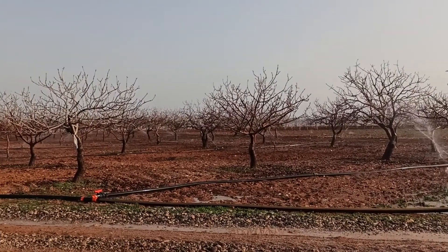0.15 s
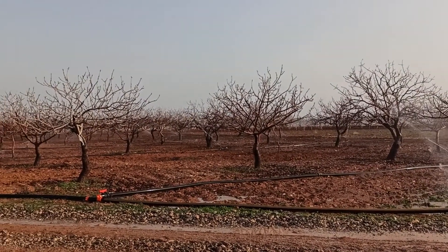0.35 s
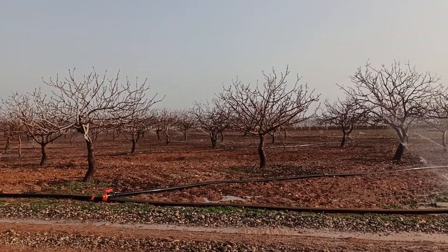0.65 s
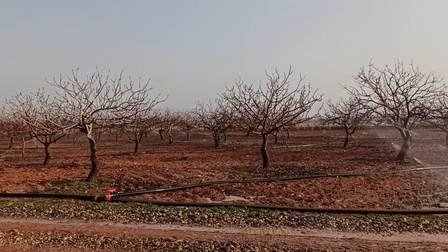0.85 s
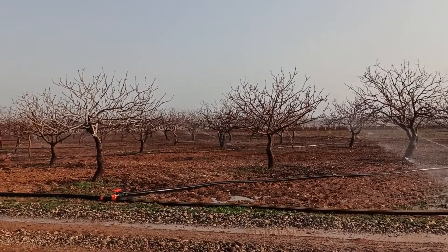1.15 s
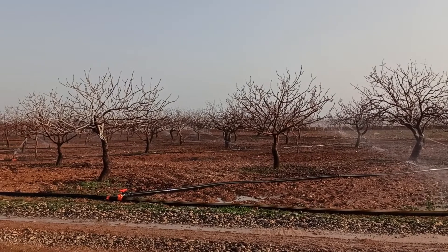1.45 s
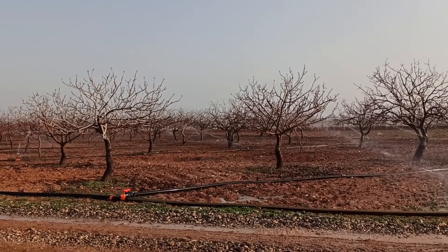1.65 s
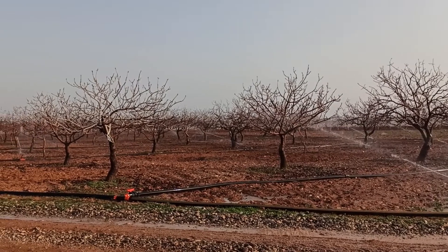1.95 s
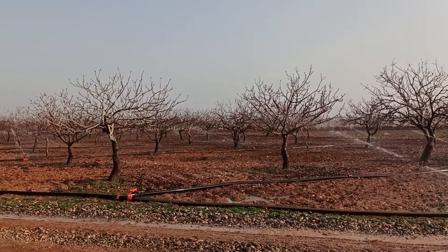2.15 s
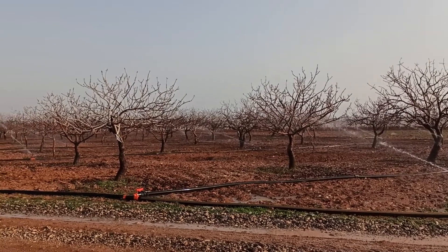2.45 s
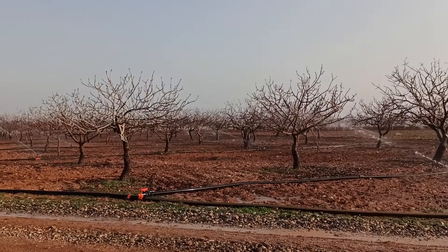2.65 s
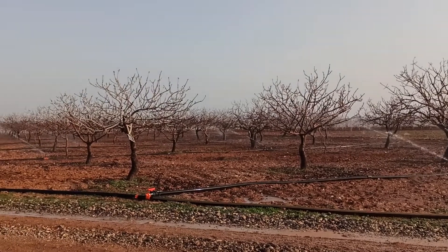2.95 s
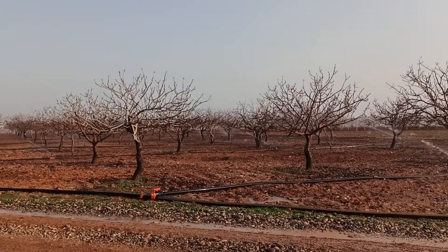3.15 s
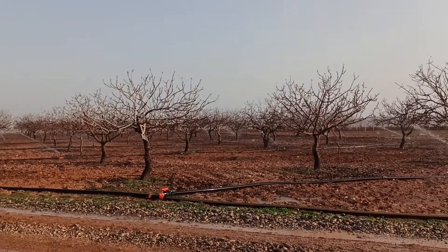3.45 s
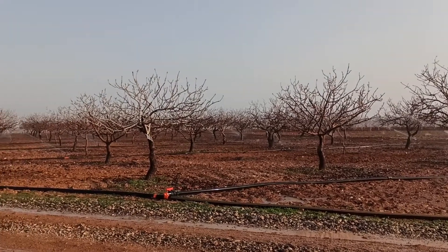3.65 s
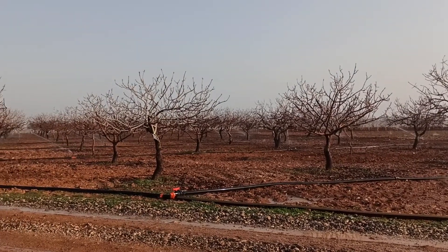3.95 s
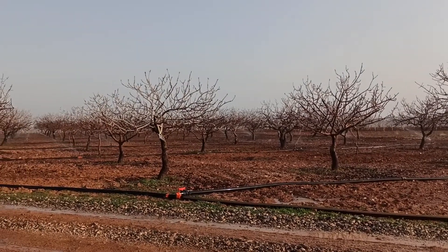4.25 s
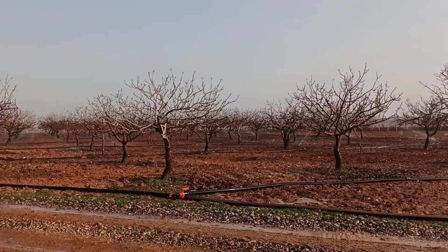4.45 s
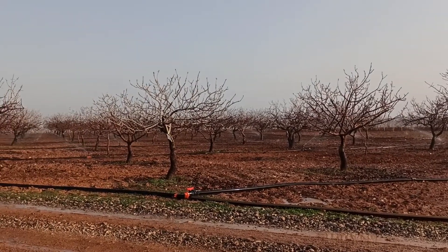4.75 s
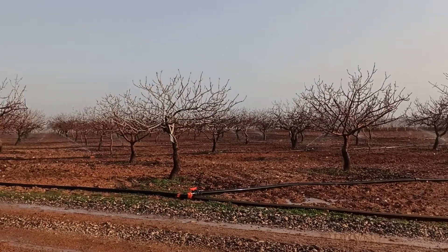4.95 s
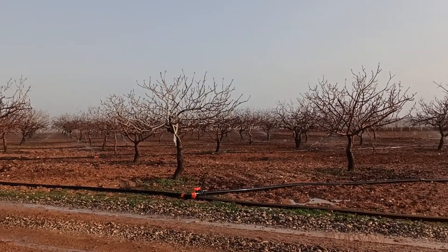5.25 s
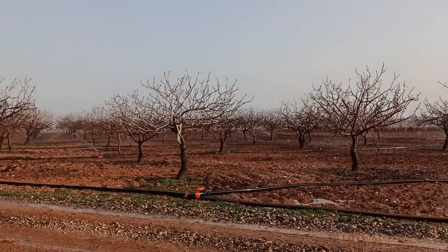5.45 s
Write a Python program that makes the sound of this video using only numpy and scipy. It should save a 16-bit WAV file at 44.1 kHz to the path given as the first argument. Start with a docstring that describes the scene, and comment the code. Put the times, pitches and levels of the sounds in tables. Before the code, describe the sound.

An impact sprinkler ticks and spits hissing water, switching between a quick rattle and slower even steps, with light wind rumbling on the microphone.

```python
"""An open orchard, with the microphone near an impact sprinkler. Its arm chops the jet: a quick rattle as
the head swings back, slow even steps as it sweeps forward, then the rattle again. Every chop is a slap,
a crack and a spit of spray. The jets hiss, drops land nearby, and two more sprinklers tick farther off.
Light wind buffets the microphone over the distant air, and there are two dry knocks right beside it."""
import sys
import numpy as np
from scipy import signal
from scipy.fft import rfft, irfft, next_fast_len
from scipy.io import wavfile
from scipy.ndimage import uniform_filter1d

SR = 44100
rng = np.random.default_rng(int(sys.argv[2]) if len(sys.argv) > 2 else 0)


def digitize_waveform(pressure):
    """Quantize a signal to 16-bit integers and store it at the path in sys.argv[1].

    Rows of a 2-D input are taken as channels; values are limited to [-1, 1].
    """
    field = np.atleast_2d(pressure).T
    bounded = np.clip(field, -1, 1)
    quanta = np.round(bounded * 32767).astype(np.int16)
    wavfile.write(sys.argv[1], SR, quanta)


N = 246508
TIME = np.arange(N) / SR

# near sprinkler, runs of chops forward and back: (start [s], end [s], first gap [s], settled gap [s])
SWEEP_RUNS = [(0.0801, 0.15, 0.1163, 0.1174), (1.8373, 4.8, 0.1163, 0.1174)]
RETURN_RUNS = [(0.2045, 1.75, 0.037, 0.04485), (4.8767, 5.59, 0.0367, 0.04855)]
# a chop as the head turns: (time [s], slap [dB], crack [dB], coarse spray [dB], fine spray [dB])
SWEEP_LEVELS = [(0.08, -44, -44, -41.5, -40), (1.84, -46, -35, -41.5, -50.5),
                (2.19, -45.5, -31.5, -45, -41.5), (2.42, -33.5, -29.5, -44.5, -44),
                (2.95, -46.5, -31, -39.5, -45), (3.6, -36.5, -28, -37.5, -41.5),
                (4.08, -34.5, -24.5, -41, -38), (4.76, -38, -29, -41, -40.5)]
RETURN_LEVELS = [(0.2, -39, -41, -48.5, -45.5), (0.45, -42.5, -49, -45, -49),
                 (0.85, -46, -52, -46.5, -55.5), (1.02, -38.5, -58, -45.5, -51),
                 (1.1, -32, -52, -41.5, -43), (1.25, -29, -54, -45, -42.5), (1.32, -42, -55, -50.5, -50),
                 (1.47, -32.5, -52, -43, -40), (1.65, -30, -36, -48.5, -45), (1.73, -40, -38, -50, -49),
                 (4.88, -42.5, -28.5, -42.5, -42), (5.07, -42.5, -35, -45, -39.5),
                 (5.3, -32.5, -29, -40.5, -37), (5.57, -28, -56, -46.5, -38)]
# chops where the arm lands squarely: (time [s], extra slap [dB], extra crack [dB])
HARD_BLOWS = [(0.43, 11, 9), (0.51, 11, 10), (0.59, 15.5, 6), (0.67, 15.5, 11), (1.17, 3, 0),
              (1.214, 1.5, 0), (1.6, 1, -2), (2.3, 6, -0.5), (2.65, 5, 1), (2.77, 9.5, 0.5),
              (3.235, 11.5, 3.5), (3.585, 6.5, 3), (3.82, 5.5, 1), (4.52, 4, 4), (4.877, 10, 7),
              (4.914, 8, 5.5), (4.99, 10.5, 6), (5.145, 9.5, 3), (5.394, 2.5, 0)]
# the arm's metal ring: (frequency [Hz], time to fall 60 dB [s], level against the crack [dB])
ARM_RING = (7425, 0.021, -2)
# reflection off the soil: (strength [ratio], shortest delay [s], longest delay [s])
GROUND_BOUNCE = (0.67, .0008, .003)
# far sprinklers, one row each: (time it faces the microphone [s], gap between ticks [s])
FAR_BEATS = [(2.492, 0.115), (3.317, 0.1329)]
# the same two: (level when facing [dB], rise before [dB/s], fade after [dB/s])
FAR_LEVELS = [(-45.5, 7, 7.5), (-44.5, 12, 4.5)]
# stray spits between the beats: (time [s], level [dB])
STRAY_SPITS = [(2.111, -48.5), (3.399, -41), (3.44, -47.5), (4.201, -47), (4.473, -48.5)]
# water landing nearby: (time [s], level [dB], pitch [Hz])
SPLATS = [(4.583, -58, 1770), (4.655, -59, 814), (4.693, -54, 1790), (4.80, -58, 2060), (4.849, -58, 1894),
          (4.87, -55, 778)]
# eddies that thump the microphone: (time [s], peak [dB], pitch [Hz])
BUFFETS = [(1.349, -34, 150), (1.373, -27, 135), (1.439, -28, 124), (1.529, -30.5, 158), (1.614, -32, 126),
           (1.773, -27, 181), (1.861, -27.5, 153), (1.868, -20, 236), (2.09, -32.5, 123), (2.185, -31, 192),
           (2.436, -27.5, 153), (2.558, -35, 157), (2.726, -29, 123), (2.955, -32, 131), (3.09, -38, 149),
           (4.068, -35, 118), (4.347, -40.5, 117), (5.019, -36.5, 170), (5.199, -38, 135),
           (5.48, -29.5, 129), (5.502, -31, 135)]
# knocks on the camera body: (time [s], peak [dB], lower edge [Hz], upper edge [Hz])
KNOCKS = [(2.9128, -16.5, 150, 1230), (5.456, -35.5, 350, 1020)]
# bands the microphone dulls: (from [Hz], to [Hz], gain [dB])
MIC_DIPS = [(4786, 6123, -10.5), (8526, 11585, -14.5)]

# how the layers swell and fade: (time [s], level [dB])
MIST_LEVEL = [(0, -55), (0.7, -54), (1.1, -52.5), (1.6, -51.5), (1.9, -51.5), (3.0, -49.5), (3.8, -54),
              (4.6, -84), (5.0, -60), (5.59, -55)]  # torn off the jet at each chop
JET_LEVEL = [(0.0, -50), (0.19, -51.5), (0.45, -48.5), (1.65, -48.5), (1.91, -50.5), (3.11, -51),
             (3.35, -47.5), (3.9, -50), (5.1, -50), (5.5, -47)]
PATTER_LEVEL = [(0, -88), (4.4, -71.5), (4.8, -67), (5.3, -65), (5.59, -72)]
WIND_LEVEL = [(0.0, -58.5), (0.75, -62.5), (1.2, -59), (1.36, -46.5), (1.7, -50), (1.87, -37.5), (2.0, -48),
              (2.12, -42), (2.28, -49.5), (2.45, -42), (2.72, -61.5), (2.98, -49.5), (3.6, -56.5),
              (4.45, -59), (4.62, -55), (5.05, -50), (5.4, -50.5), (5.52, -48)]  # one long gust and a weaker one

# spectra: (frequency [Hz], relative level [dB])
SLAP_COLOUR = [(1500, -80), (2600, -24), (3200, -11.5), (3700, 2), (4200, 3.5), (4700, -9.5), (5400, -25),
               (8000, -52)]
COARSE_COLOUR = [(1200, -57), (2400, -25), (2900, -16.5), (3300, -6.5), (3700, -3), (4250, 0.5), (4700, -1),
                 (5200, -5.5), (6500, -48.5), (9000, -61.5)]  # coarse spray
FINE_COLOUR = [(4000, -34.5), (5700, -11.5), (6200, -8), (6900, -1.5), (7550, 3), (7900, -9.5), (8400, -24),
               (9300, -31.5), (10500, -25), (11700, -22), (12500, -31), (14400, -26), (15700, -30)]  # fine spray and the crack
MIST_COLOUR = [(6000, -13), (7000, -6), (7700, 7), (8400, -0.5), (9500, -8), (11800, -2), (12700, -11),
               (14400, -2.5), (15700, -13)]
JET_COLOUR = [(1000, -18.5), (2000, -21), (2700, -15), (3400, -4.5), (4600, 0), (6300, -2), (7500, -4.5),
              (7850, -11), (8500, -15), (10000, -20.5), (11700, -15.5), (12600, -19.5), (15700, -23)]
WIND_COLOUR = [(20, -32), (38, -38), (60, -3.5), (85, 3.5), (145, -1), (230, -9.5), (340, -15.5),
               (600, -34), (1500, -53)]
AIR_COLOUR = [(40, -11.5), (90, 0.5), (200, -7.5), (350, -9), (650, -7), (1100, -17.5), (1700, -20),
              (2600, -22), (5000, -55)]

SETTLE_CHOPS = 20  # how gradually the arm eases into its settled gap
BLOW_SCATTER_DB = 1.5  # no two blows are quite alike
RETURN_MIST_DB = 2.0  # quick chops tear off more mist
FAR_FINE_DB = 3  # fine spray over coarse in a far tick
BUFFET_CYCLES, BUFFET_SHAPE = 0.57, 1.11  # how fast an eddy's rebounds die, how pointed its swing is
AIR_DB = -59.5
LOW_CUT_HZ, HIGH_CUT_HZ = 41.5, 15850


def forward_steps():
    """Close by, the arm swings hard into the jet: a blow, and spray that starts at once and dies away."""
    out = np.zeros(N)
    for s, slap_db, crack_db, coarse_db, fine_db in chops(SWEEP_RUNS, SWEEP_LEVELS):
        add(out, s, arm_blow(slap_db, crack_db, rise=0.0017))
        coarse = burst(COARSE_COLOUR, rise=0.002, fall=0.014, shape=2.0, clump_db=1.5)
        fine = burst(FINE_COLOUR, rise=0.0022, fall=0.016, shape=3.0, clump_db=3)
        mist = burst(MIST_COLOUR, rise=0.0029, fall=0.018, shape=2.3, clump_db=2)
        add(out, s + 0.0015, gain_of(coarse_db) * coarse)
        add(out, s + 0.002, gain_of(fine_db) * fine)
        add(out, s + 0.002, level(MIST_LEVEL, s) * mist)
    return out


def return_rattle():
    """Short swings keep the arm in the jet for longer: rounder spits, whose fine spray trails the blow."""
    out = np.zeros(N)
    for s, slap_db, crack_db, coarse_db, fine_db in chops(RETURN_RUNS, RETURN_LEVELS):
        add(out, s, arm_blow(slap_db, crack_db, rise=0.0023))
        coarse = burst(COARSE_COLOUR, rise=0.01, fall=0.016, shape=2.7, clump_db=2)
        fine = burst(FINE_COLOUR, rise=0.011, fall=0.0093, shape=1.68, clump_db=3)
        mist = burst(MIST_COLOUR, rise=0.0093, fall=0.013, shape=2.2, clump_db=7)
        add(out, s + 0.004, gain_of(coarse_db) * coarse)
        add(out, s + 0.007, gain_of(fine_db) * fine)
        add(out, s + 0.008, gain_of(RETURN_MIST_DB) * level(MIST_LEVEL, s) * mist)
    return out


def arm_blow(slap_db, crack_db, rise, size=4096):
    """The arm meets the jet: a slap swelling over rise seconds, then a higher crack and a metal ring."""
    slap = gain_of(slap_db) * burst(SLAP_COLOUR, rise=rise, fall=0.0022, shape=1.0, clump_db=8)
    crack = gain_of(crack_db) * burst(FINE_COLOUR, rise=0.00085, fall=0.0016, shape=0.6, clump_db=1.5)
    hz, t60, ring_db = ARM_RING
    t = (np.arange(size) - size // 2) / SR
    attack = np.clip(t / 0.001, 0, 1)
    decay = gain_of(crack_db + ring_db - 60 * np.maximum(t, 0) / t60)
    ring = attack * decay * np.sin(2 * np.pi * hz * rng.uniform(0.99, 1.01) * t)
    return slap + np.roll(crack + ring, round(0.0004 * SR))


def chop_times(runs):
    """The moments at which the arm meets the jet; the gaps lengthen as its swing settles."""
    times = []
    for start, end, first_gap, settled_gap in runs:
        count = np.arange(int((end - start) / first_gap) + 1)
        lead = (settled_gap - first_gap) * SETTLE_CHOPS * (1 - np.exp(-count / SETTLE_CHOPS))
        s = start + settled_gap * count - lead
        times.extend(s[s < end])
    return np.array(times)


def chops(runs, levels):
    """Each chop's time and levels, set by the head's aim, how squarely the arm lands, and chance."""
    s = chop_times(runs)
    when, *columns = np.transpose(levels)
    slap, crack, coarse, fine = [np.interp(s, when, column) for column in columns]
    for at, slap_db, crack_db in HARD_BLOWS:
        hit = abs(s - at) < 0.015
        slap[hit] += slap_db
        crack[hit] += crack_db
    scatter = rng.standard_normal((len(s), 4)) * [BLOW_SCATTER_DB, BLOW_SCATTER_DB, 0, 0]
    return np.column_stack([s, np.transpose([slap, crack, coarse, fine]) + scatter])


def burst(colour, rise, fall, shape, clump_db, size=4096):
    """A spit of water that swells and dies over rise and fall seconds; shape 1 is pointed, 2 is round."""
    t = (np.arange(size) - size // 2) / SR
    swell = np.exp(-abs(t / np.where(t < 0, rise, fall)) ** shape)
    spit = swell * clumped_noise(size, clump_db, per_s=899.6)
    # each spit breaks up at another height, so its bounce off the soil combs it differently
    strength, shortest, longest = GROUND_BOUNCE
    delay = rng.uniform(shortest, longest)
    spit = spit + strength * np.roll(spit, round(delay * SR))
    return tint(spit, colour) * np.sqrt(np.mean(swell ** 2))


def falling_water():
    """The jets hiss on between the chops, and their drops patter and splat on the soil nearby."""
    jets = level(JET_LEVEL) * tint(clumped_noise(N, clump_db=3, per_s=450), JET_COLOUR)
    landing = level(PATTER_LEVEL) * tint(clumped_noise(N, clump_db=2.5, per_s=150), hump(1970))
    for s, db, hz in SPLATS:
        add(landing, s, gain_of(db) * burst(hump(hz), rise=0.0063, fall=0.014, shape=1.5, clump_db=4))
    return jets + landing


def far_sprinklers():
    """Two far heads tick at their own pace, swelling and fading as they turn; stray spits fall between."""
    out = np.zeros(N)
    for (facing, gap), (db, rise, fade) in zip(FAR_BEATS, FAR_LEVELS):
        for s in np.arange(facing % gap, N / SR, gap):
            turned_away_db = max(rise * (facing - s), fade * (s - facing))
            add(out, s, far_tick(db - turned_away_db))
    for s, db in STRAY_SPITS:
        add(out, s, far_tick(db))
    return out


def far_tick(db):
    """Distance leaves only a faint, short tick of a chop."""
    coarse = burst(COARSE_COLOUR, rise=0.0038, fall=0.0079, shape=1.8, clump_db=11)
    fine = burst(FINE_COLOUR, rise=0.0018, fall=0.0039, shape=1.0, clump_db=19)
    return gain_of(db) * (coarse + gain_of(FAR_FINE_DB) * np.roll(fine, round(0.0011 * SR)))


def wind():
    """Lumpy rumble on the microphone; each strong eddy is one swing of pressure with its rebounds."""
    out = level(WIND_LEVEL) * tint(clumped_noise(N, clump_db=3, per_s=42), WIND_COLOUR)
    t = np.arange(-2048, 2049) / SR
    for s, db, hz in BUFFETS:
        swell = np.exp(-abs(t * hz / BUFFET_CYCLES) ** BUFFET_SHAPE)
        add(out, s, gain_of(db) * swell * np.cos(2 * np.pi * hz * t))
    return out


def knocks():
    """Right at the microphone: each knock is a single push on the camera body, too damped to ring."""
    out = np.zeros(N)
    for s, db, low_hz, high_hz in KNOCKS:
        body = signal.butter(2, [low_hz, high_hz], "bandpass", fs=SR, output="sos")
        push = signal.sosfilt(body, signal.unit_impulse(2048, "mid"))
        add(out, s, -gain_of(db) * push / abs(push).max())
    return out


def distant_air():
    """The low, steady wash of outdoor air, far behind everything."""
    return gain_of(AIR_DB) * tint(rng.standard_normal(N), AIR_COLOUR)


def clumped_noise(size, clump_db, per_s):
    """Noise in clumps, like water or wind: its level wanders through per_s random values a second."""
    knots = rng.standard_normal((2, size))
    wander = np.interp(np.arange(size) * per_s / SR, np.arange(size), knots[1])
    return knots[0] * gain_of(clump_db * wander)


def gain_of(db):
    """Decibels to amplitude."""
    return 10 ** (np.asarray(db) / 20)


def level(curve, s=TIME):
    """The gain of a (time [s], level [dB]) curve at time s, by default at every sample."""
    return gain_of(np.interp(s, *np.transpose(curve)))


def tint(x, colour):
    """Filters x by a (frequency [Hz], level [dB]) spectrum; the result has rms 1."""
    hz, db = np.transpose(colour)
    size = next_fast_len(len(x))
    bins = np.fft.rfftfreq(size, 1 / SR)
    response = gain_of(np.interp(np.log(bins + 1), np.log(hz), db))
    tinted = irfft(rfft(x, size) * response, size)[:len(x)]
    return tinted / np.sqrt(np.mean(tinted ** 2) + 1e-20)


def hump(hz):
    """A broad resonance as a spectrum."""
    return [(hz / 2, -35), (hz * 0.82, -6), (hz, 0), (hz * 1.19, -6), (hz * 2, -40)]


def add(mix, s, sound):
    """Mixes a sound in, with its middle at time s."""
    start = round(s * SR) - len(sound) // 2
    part = mix[max(start, 0):max(start + len(sound), 0)]
    part += sound[max(-start, 0):][:len(part)]


def scene():
    """The orchard in mono, from beside the near sprinkler."""
    sprinklers = forward_steps() + return_rattle() + far_sprinklers()
    return (sprinklers + falling_water() + wind() + knocks() + distant_air())[None]


def record(dry):
    """The microphone cuts deep bass, dulls two treble bands and loses the very top."""
    hz = np.fft.rfftfreq(N, 1 / SR)
    dips_db = sum(db * ((hz > low) & (hz < high)) for low, high, db in MIC_DIPS)
    dips_db = uniform_filter1d(dips_db.astype(float), size=700)  # soften the band edges
    low_cut = hz ** 4 / (hz ** 4 + LOW_CUT_HZ ** 4)
    high_cut = signal.firwin(511, HIGH_CUT_HZ, window=("kaiser", 9), fs=SR)
    heard = irfft(rfft(dry) * gain_of(dips_db) * low_cut, N)
    return signal.oaconvolve(heard, high_cut[None], "same")


dry = scene()
out = record(dry)
digitize_waveform(out)
```